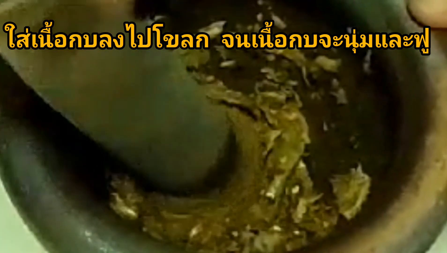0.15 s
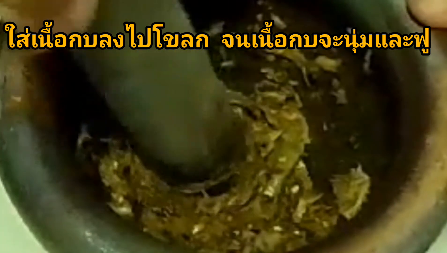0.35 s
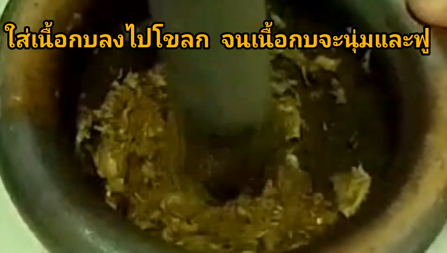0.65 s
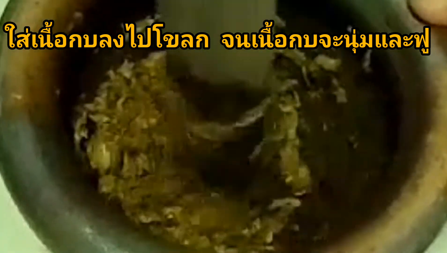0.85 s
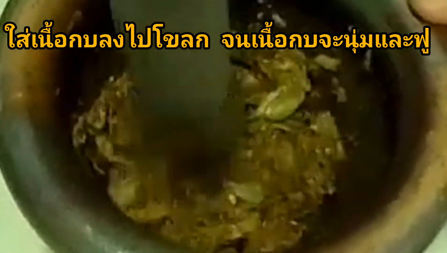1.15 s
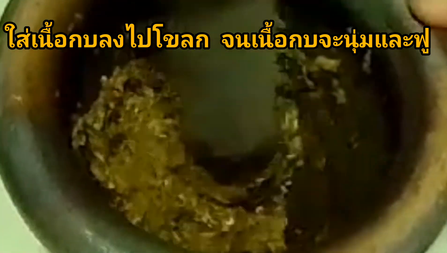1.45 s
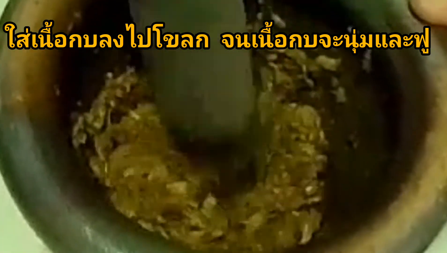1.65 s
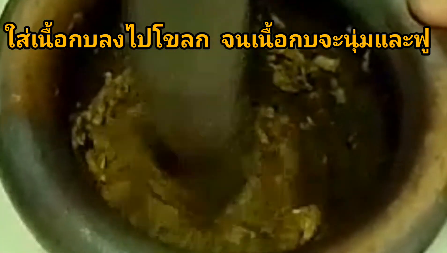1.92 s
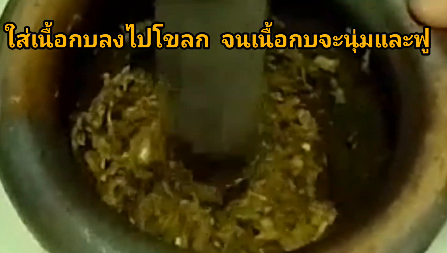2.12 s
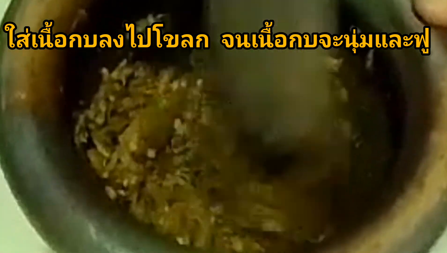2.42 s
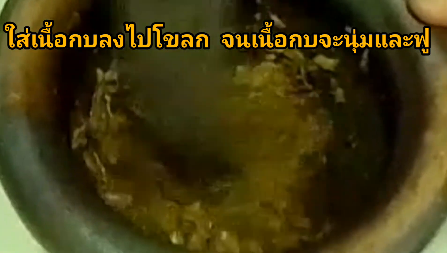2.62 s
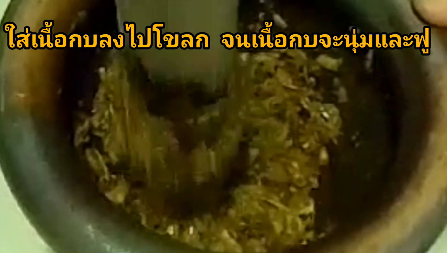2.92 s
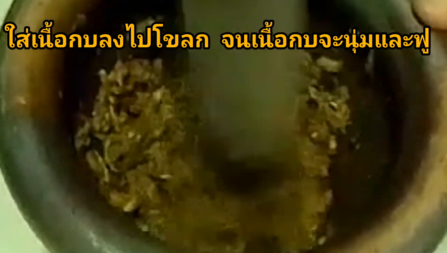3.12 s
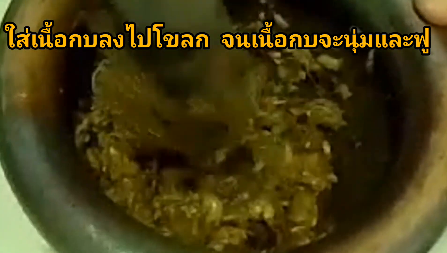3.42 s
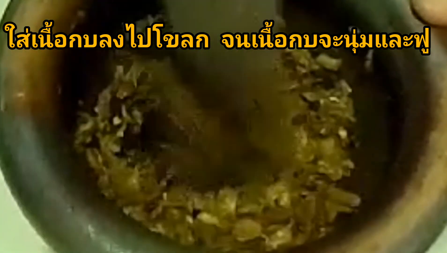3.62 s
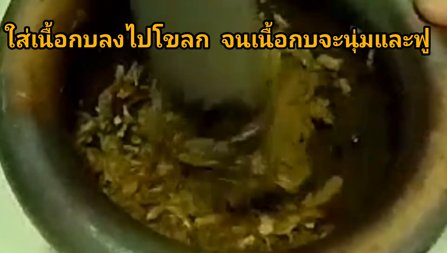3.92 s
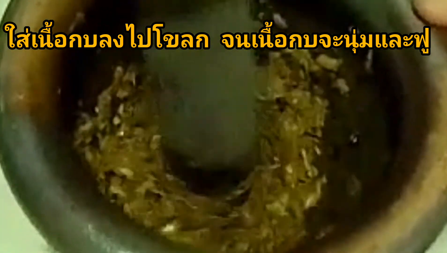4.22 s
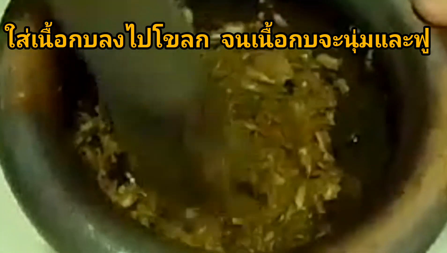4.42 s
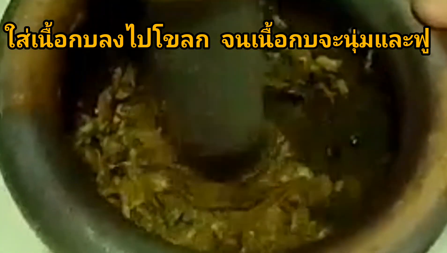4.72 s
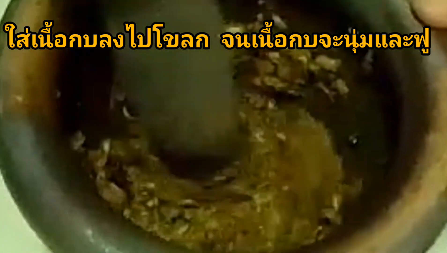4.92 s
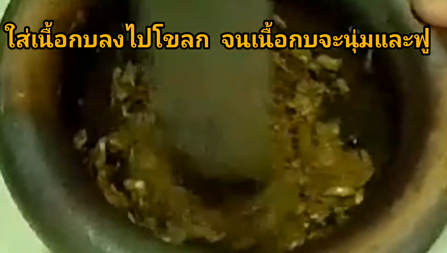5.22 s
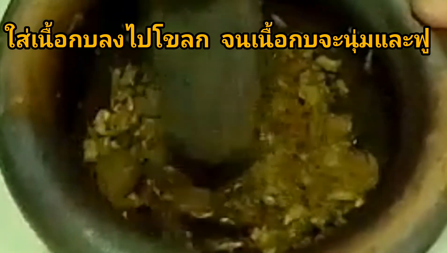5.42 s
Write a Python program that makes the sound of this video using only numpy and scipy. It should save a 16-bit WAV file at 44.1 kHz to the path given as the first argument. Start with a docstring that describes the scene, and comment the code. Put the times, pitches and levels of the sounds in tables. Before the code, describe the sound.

A stone pestle pounds moist, shredded food in a stone mortar, soft gritty squashes mixed with uneven hard clacks and short ringing knocks.

```python
"""On a kitchen counter, close to a small microphone, a stone pestle pounds moist food in a stone mortar.
Most strokes only squash the food, heard as swells of grainy noise with a wet body and a bright fizz.
Some reach the stone, clack and skid: force pulses excite decaying modes of bowl, pestle and counter.
The food sets the rim singing faintly, the room answers with a brief tail of sparse echoes, and
a steady room tone, a wavering low rumble and a drone, all shaped noise, lie behind."""
import sys
import numpy as np
from scipy import signal
from scipy.fft import rfft, irfft
from scipy.io import wavfile
from scipy.ndimage import uniform_filter1d

SR = 44100
rng = np.random.default_rng(int(sys.argv[2]) if len(sys.argv) > 2 else 0)


def volts_from_db(level):
    """Convert decibel levels to linear amplitude ratios."""
    exponent = np.asarray(level, float) / 20
    return 10 ** exponent


def bounce(signal):
    """Save signal as a 16-bit WAV file at the path given by the first command-line argument."""
    frames = np.transpose(np.atleast_2d(signal))
    limited = np.clip(frames, -1, 1)
    pcm = np.round(limited * 32767).astype(np.int16)
    wavfile.write(sys.argv[1], SR, pcm)


N = 245195  # samples


def evened(x):
    """Normalisation: scales a signal to unit rms."""
    return x / np.sqrt(np.mean(x ** 2) + 1e-20)


def read(points, hz):
    """Interpolation of a curve along a logarithmic frequency axis."""
    f, value = np.transpose(points)
    return np.interp(np.log(hz + 1), np.log(f + 1), value)


def add(mix, s, sound):
    """Superposition: adds a sound to the mix, in place, from s seconds on."""
    part = mix[round(s * SR):][:len(sound)]
    part += sound[:len(part)]


def coloured(x, spectrum):
    """Linear filtering: weights the spectrum of x by a curve in dB, then sets rms 1."""
    hz = np.fft.rfftfreq(len(x), 1 / SR)
    shaped = rfft(x) * volts_from_db(read(spectrum, hz))
    return evened(irfft(shaped, len(x)))


def grit(spread_db, shape):
    """Impulsive noise: a heavy-tailed law lets a few grains stand far above the rest."""
    boost = np.minimum(rng.exponential(1, shape), 6)
    return rng.standard_normal(shape) * volts_from_db(spread_db * boost)


# Clean knocks of stone on stone. Each row: start in seconds, then the levels in dB of
# clack, bowl ring, pestle ring and counter thud, all before the filters in stones().
STONE_KNOCKS = [(0.8225, -24.5, -61, -47, -84), (.8283, -46, -65, -53, -53), (2.0295, -34, -54, -82, -52.5),
                (2.1899, -35, -53, -67, -40.5), (2.194, -46, -32.5, -80, -76),
                (2.5184, -27.5, -52, -27.5, -80), (3.2125, -45, -66, -72.5, -68),
                (3.9056, -27.5, -79, -28, -67), (4.07, -41, -53, -65, -63), (4.082, -61, -34, -52, -69),
                (4.9534, -37, -41.5, -72, -73), (5.156, -39, -34, -85, -51), (5.493, -46, -28, -68, -39.5),
                (5.498, -23, -66, -45, -47.5)]
# Skids of the pestle over gritty stone. Each row: start in seconds, time to full load in seconds,
# then the levels in dB of clack, bowl ring and pestle ring, before the same filters.
GRITTY_SKIDS = [(.676, 0.0014, -78, -63.5, -88), (0.722, 0.012, -57, -90, -83),
                (.819, 0.0026, -29.5, -52, -16.5), (.834, 0.0019, -50, -56, -26.5),
                (0.849, 0.0085, -41, -54, -41), (.964, 0.011, -51, -48, -33), (1.076, 0.011, -63, -69, -75),
                (1.229, 0.0035, -59.5, -93, -103), (1.508, 0.0043, -55.5, -62, -90),
                (1.832, 0.002, -61.5, -55.5, -86), (2.031, 0.0018, -59, -43, -82),
                (2.049, 0.013, -50.5, -52.5, -94), (2.216, 0.0046, -69, -47.5, -88),
                (2.524, 0.0024, -48, -77, -41.5), (2.529, .008, -32.5, -31.5, -74),
                (2.551, 0.0061, -49, -41.5, -64), (2.588, 0.0091, -55, -61, -72),
                (2.713, .0078, -45.5, -51.5, -81), (2.734, 0.007, -51.5, -55.5, -90),
                (2.768, .006, -53, -59, -82), (2.876, 0.0043, -64, -57.5, -81), (3.054, .01, -68, -50, -90),
                (3.215, 0.0056, -52, -47.5, -87.5), (3.727, 0.011, -53, -49.5, -80.5),
                (3.752, 0.0041, -55, -52.5, -88), (3.793, 0.0054, -73, -62, -90),
                (3.915, 0.011, -46, -52.5, -37.5), (3.967, 0.015, -55, -67, -95),
                (4.087, 0.0018, -34, -39, -66), (4.105, 0.0066, -41.5, -43.5, -60),
                (4.134, 0.016, -56, -58.5, -82), (4.423, 0.015, -86, -53, -102),
                (4.48, 0.019, -69, -65, -96), (4.958, 0.014, -36, -71, -73),
                (4.973, 0.0065, -51, -36.5, -66), (5.022, 0.021, -53.5, -59, -88),
                (5.186, 0.012, -54, -53, -87), (5.324, 0.0017, -44.5, -38, -75),
                (5.349, 0.007, -59, -51, -88), (5.465, 0.0035, -52, -58, -46.5)]


def contacts():
    """Contact loading: rows of start s, clack, bowl, pestle and thud dB, and time to full load s."""
    knock_s, squash_s = 0.00049, 0.0053  # times to full load
    skid_thud_db = -22  # against the louder of clack and bowl ring
    knocks = [(*row, knock_s) for row in STONE_KNOCKS]
    skids = [(s, clack, bowl, pestle, max(clack, bowl) + skid_thud_db, load_s)
             for s, load_s, clack, bowl, pestle in GRITTY_SKIDS]
    # a squash drives the counter here; its faint ringing is made in rim()
    squashes = [(s, -200, -200, -200, thud, squash_s) for s, _, _, thud, _ in FOOD_SQUASHES]
    return knocks + skids + squashes


def ring(force, modes, spot_db):
    """Modal response: a force excites decaying sines, shared out by the spot struck. Loudest 4 ms at rms 1."""
    t = np.arange(SR // 5) / SR
    tap = sum(volts_from_db(db + spot - 60 * t / t60) * np.sin(2 * np.pi * hz * t)
              for (hz, db, t60), spot in zip(modes, spot_db))
    tap *= volts_from_db(-20 * (t / .065) ** 3)  # paste and hand close on the stone and choke the ring
    sound = signal.fftconvolve(force, tap)
    return sound / np.sqrt(uniform_filter1d(sound ** 2, size=176).max())


# Modes of the bowl. Each row: frequency in Hz, relative level in dB before the random striking
# spot, t60 in seconds before the choke in ring(). The four mode tables below have the same columns.
BOWL_MODES = [(729, 0, .13), (705, -13, .07), (760, -6, .07), (610, -26, .05), (830, -15, .05)]
# Modes of the pestle.
PESTLE_MODES = [(1915, 0, .11), (1995, -7, .05), (4815, 2, .08), (4900, -4, .05), (3860, -2, .04),
                (5950, -16, .04), (8350, -20, .04)]
# Modes of the mortar wall, heard in the clack.
WALL_MODES = [(1000, -6, .025), (1090, -4, .03), (1200, -2, .04), (1290, -2, .03), (1400, -3, .025),
              (1510, 0, .04), (1600, 0, .035), (1705, 0, .04), (1810, -3, .025), (2075, -3, .04),
              (2200, -8, .025), (2350, -12, .04)]
# Short modes that make the crack of the clack.
CRACK_MODES = [(1390, 18, 0.00703), (2970, 3, 0.015), (3280, -4.5, .012), (3976, 11.5, .012)]
# Modes of the counter.
COUNTER_MODES = [(68, -23.5, 0.017), (97, -8, 0.033), (170, 0.5, 0.06), (217, 4.5, 0.12),
                 (257.7, 13, 0.065), (364, -4.5, 0.33), (429, -18.5, 0.088)]


def stones():
    """Forced vibration: grit in each contact load drives the rings, its bulk the counter."""
    rings, thuds, t = np.zeros(N), np.zeros(N), np.arange(SR // 9) / SR
    rows = contacts()
    spots = rng.standard_normal((len(rows), 16))
    grains = grit(4.76, (len(rows), len(t)))
    for (s, clack_db, bowl_db, pestle_db, thud_db, load_s), spot, grain in zip(rows, spots, grains):
        u = t / np.clip(load_s, .0001, .03)
        load = u * np.exp(1 - u)
        force = load * (8 * np.exp(-load_s / .0005) + grain)  # a brief contact is one clean tap
        change = np.diff(force)  # the clack follows changes of force
        push = np.diff(load) + .02 * force[1:]
        add(rings, s, volts_from_db(clack_db) * ring(change, WALL_MODES + CRACK_MODES, 3 * spot))
        add(rings, s, volts_from_db(bowl_db) * ring(force, BOWL_MODES, 3 * spot[::-1]))
        add(rings, s, volts_from_db(pestle_db) * ring(force, PESTLE_MODES, 3 * spot[4:]))
        add(thuds, s, volts_from_db(thud_db) * ring(push, COUNTER_MODES, 4 * spot[8:]))
    # a small bowl radiates no bass
    small = signal.butter(4, 600, "highpass", fs=SR, output="sos")
    # the mat under the mortar dulls the thud
    soft = signal.butter(2, 450, fs=SR, output="sos")
    # steep low-pass: little of the clack and rings is heard above 2.3 kHz
    steep = signal.butter(8, 2250, fs=SR, output="sos")
    rings = signal.sosfilt(steep, rings) + volts_from_db(-33) * rings
    return signal.sosfilt(small, rings) + signal.sosfilt(soft, thuds)


def pockets(x, depth_db):
    """Time-varying filtering: air pockets open and close, shifting the colour in narrow streaks."""
    z = signal.stft(x, nperseg=512)[2]
    patches = uniform_filter1d(rng.standard_normal(z.shape), size=2, axis=0)  # over frequency
    patches = uniform_filter1d(patches, size=8, axis=1)  # over time
    streaked = z * volts_from_db(depth_db * evened(patches))
    return evened(signal.istft(streaked, nperseg=512)[1][:N])


# The pestle comes down into the food. Each row: touch in seconds, fizz level in dB, wet body level
# in dB, counter thud level in dB before the mat, fall time in seconds before its limit in food().
FOOD_SQUASHES = [(0.673, -74, -66.5, -76, 0.014), (0.839, -71.5, -52, -84, 0.037),
                 (.997, -72.5, -53, -73, .024), (1.165, -74, -66.5, -82, 0.04), (1.33, -75, -68, -92, 0.02),
                 (1.503, -74, -66, -78, 0.015), (1.668, -69, -65, -89, 0.017),
                 (1.835, -69.5, -54, -57.5, 0.0062), (2.02, -76, -61.5, -81, 0.0087),
                 (2.183, -76, -57.5, -79, 0.0042), (2.355, -75, -61.5, -68, 0.0045),
                 (2.53, -66.5, -49.5, -60, 0.0037), (2.692, -77, -66.5, -76, .017),
                 (2.865, -79, -67, -56.5, 0.017), (3.046, -72, -57.5, -81, 0.0038),
                 (3.202, -74.5, -71, -60, 0.04), (3.379, -70, -64.5, -80.5, 0.018),
                 (3.553, -73, -71.5, -88, 0.024), (3.728, -76.5, -66, -58.5, 0.014),
                 (3.902, -75.5, -50.5, -57.5, 0.0096), (4.067, -71.5, -65.5, -51.5, 0.023),
                 (4.247, -79.5, -69, -70, 0.012), (4.421, -79.5, -69.5, -79, 0.024),
                 (4.596, -75, -69.5, -72.5, 0.017), (4.778, -77, -73, -80.5, 0.026),
                 (4.948, -75.5, -67, -54, 0.11), (5.144, -68, -62.5, -79, 0.023),
                 (5.313, -66, -61, -53, 0.021), (5.46, -71, -87, -52, 0.017), (5.49, -54.5, -52, -58, .006)]
# The food peels off as the pestle lifts. Each row: start in seconds, fizz level in dB,
# wet body level in dB.
FOOD_PEELS = [(.72, -74, -63.5), (1.067, -71, -57), (1.233, -77.5, -64.5), (1.393, -85, -76),
              (1.566, -83, -66), (1.726, -81, -66), (1.894, -81, -69.5), (2.253, -82, -58.5),
              (2.43, -93, -70.5), (2.583, -85, -58), (2.764, -78, -78), (2.927, -94, -76.5),
              (3.099, -89, -75), (3.269, -74.5, -68), (3.441, -88, -74), (3.623, -84, -75),
              (3.79, -89, -67), (3.971, -78.5, -69), (4.138, -83, -73.5), (4.318, -75, -69),
              (4.487, -92, -69), (4.671, -95, -76.5), (5.031, -82, -70), (5.212, -71.5, -70),
              (5.255, -90, -75), (5.383, -68, -63.5), (5.53, -77, -78)]
# The wet mash keeps rustling between strokes. Each row: time in seconds, fizz level in dB,
# wet body level in dB.
MASH_RUSTLE = [(.6, -115, -100), (.7, -105, -80.5), (1.4, -105, -87.5), (3.6, -108, -87),
               (4.5, -105, -82.5), (4.94, -108, -79), (4.971, -85, -67), (5.13, -96, -71), (5.17, -86, -72),
               (5.3, -92, -77), (5.34, -94, -79.5), (5.56, -88, -60)]
# Spectrum of the wet body. Each row: frequency in Hz, relative density in dB per Hz.
WET_SPECTRUM = [(250, -52.5), (500, -18), (800, -4.5), (1500, -3.5), (2400, -8), (3300, -11), (4200, -20),
                (6000, -26), (9000, -72)]
# Spectrum of the fizz. Each row: frequency in Hz, relative density in dB per Hz.
FIZZ_SPECTRUM = [(1500, -63), (2800, -24.5), (4000, -3), (5500, -8), (7000, -0.5), (8600, 4), (9600, -8.5),
                 (11500, -13.5), (15000, -12.5), (16000, -33.5)]


def food():
    """Amplitude modulation: quick swells on crackling grains give a wet body and a brighter fizz."""
    squash_rise_s, peel_rise_s, peel_fall_s = 0.0064, 0.006, 0.011
    peak_after_s = 0.0084  # the crackle peaks this long after the touch
    lead_s = .04  # room for the rise ahead of the peak
    t = np.arange(SR // 5) / SR - lead_s
    s, fizz_db, wet_db = np.transpose(MASH_RUSTLE)
    clock = np.arange(N) / SR
    fizz = volts_from_db(np.interp(clock, s, fizz_db))
    wet = volts_from_db(np.interp(clock, s, wet_db))
    squashes = [(s, fizz_db, wet_db, squash_rise_s, fall) for s, fizz_db, wet_db, _, fall in FOOD_SQUASHES]
    peels = [(*row, peel_rise_s, peel_fall_s) for row in FOOD_PEELS]
    for s, fizz_db, wet_db, rise, fall in squashes + peels:
        rise, fall = np.clip([rise, fall], .001, .05)
        scale = np.where(t < 0, rise, fall)
        swell = np.exp(-(np.abs(t) / scale) ** np.where(t < 0, 1.5, 1.2))
        add(wet, s + peak_after_s - lead_s, volts_from_db(wet_db) * swell)
        add(fizz, s + peak_after_s - lead_s, volts_from_db(fizz_db) * swell)
    grains = pockets(grit(3.2, N), depth_db=5)
    return wet * coloured(grains, WET_SPECTRUM) + fizz * coloured(grains, FIZZ_SPECTRUM)


# Faint, free modes of the rim. Each row: frequency in Hz, relative level in dB, t60 in seconds.
RIM_MODES = [(1720, 3, 0.25), (2150, 5, .15), (2440, 5, 0.2), (2820, 0, .12), (3440, -6, .2),
             (3860, 0, 0.3), (4950, -2, 0.15), (5250, -4, .25), (5950, 0, 0.15)]


def rim(x):
    """Resonance: a sound in the mortar, convolved with decaying sines, leaves the free rim singing."""
    t = np.arange(SR // 3) / SR
    tap = sum(volts_from_db(db - 60 * t / t60) * np.sin(2 * np.pi * hz * t) for hz, db, t60 in RIM_MODES)
    return signal.oaconvolve(x, tap)[:N] * volts_from_db(-59)


# Reverberation of the kitchen. Each row: frequency in Hz, t60 in seconds.
KITCHEN_DECAY = [(200, .2), (800, .16), (1400, .16), (2000, .13), (3500, .22), (6000, .16), (12000, .1)]


def kitchen(x):
    """Reverberation: sparse echoes of random sign, each band dying at its own speed."""
    taps = np.zeros(SR // 2)
    at = np.arange(260, len(taps) - 20, 20)
    taps[at + rng.integers(0, 20, len(at))] = rng.choice([-1., 1.], len(at))
    hz, t, z = signal.stft(taps, SR, nperseg=256)
    decay = volts_from_db(-60 * t / read(KITCHEN_DECAY, hz)[:, None])
    tail = signal.istft(z * decay, SR, nperseg=256)[1]
    return signal.fftconvolve(x, tail / np.linalg.norm(tail))[:N]


# Spectrum of the room tone. Each row: frequency in Hz, relative density in dB per Hz.
TONE_SPECTRUM = [(20, -14), (45, 7), (80, -3.5), (160, -22.5), (300, -18), (400, -12), (650, -23),
                 (1000, -22.5), (1280, -14), (1600, -30), (2500, -32), (4000, -42.5), (8000, -44),
                 (16000, -55)]
# Spectrum of the rumble. Each row: frequency in Hz, relative density in dB per Hz.
RUMBLE_SPECTRUM = [(12, -39), (25, -16.5), (48, 4), (70, -3.5), (110, -6.5), (140, -30.5), (300, -100)]
# Spectrum of the drone. Each row: frequency in Hz, relative density in dB per Hz.
DRONE_SPECTRUM = [(50, -81), (110, -23.5), (150, -4.5), (182, -2), (230, -10.5), (265, -18), (320, -29.5),
                  (500, -100)]
# Wavering of the background. Each row: time in seconds, rumble level in dB, drone level in dB.
BACKGROUND_LEVELS = [(0.0, -84, -92), (0.48, -78.5, -101), (0.73, -76.5, -77), (0.9, -64.5, -72),
                     (0.99, -66, -72.5), (1.25, -72, -80.5), (1.47, -71.5, -88), (2.18, -65.5, -68),
                     (2.49, -69.5, -74.5), (2.79, -65, -67.5), (3.76, -67, -73.5), (4.06, -67.5, -60),
                     (4.24, -69, -74), (4.51, -65, -77), (4.99, -68, -72.5), (5.14, -66.5, -59),
                     (5.56, -66, -61)]


def background():
    """Shaped noise: a steady room tone, with a lumpy rumble and a fuzzy drone that come and go."""
    s, rumble_db, drone_db = np.transpose(BACKGROUND_LEVELS)
    t = np.arange(N) / SR
    tone, rumble, drone = rng.standard_normal((3, N))
    return (volts_from_db(-73) * coloured(tone, TONE_SPECTRUM)
            + volts_from_db(np.interp(t, s, rumble_db)) * coloured(rumble, RUMBLE_SPECTRUM)
            + volts_from_db(np.interp(t, s, drone_db)) * coloured(drone, DRONE_SPECTRUM))


def scene():
    """Superposition of mortar and food, their echo 12 dB down, and the background."""
    paste = food()
    near = stones() + paste + rim(paste)
    return (near + volts_from_db(-12) * kitchen(near) + background())[None]


def band_limit(x):
    """A steep low-pass at the top of the band."""
    return signal.sosfilt(signal.butter(12, 15480, fs=SR, output="sos"), x)


# Slowly drifting bias of the converter. Each row: time in seconds, level as a share of full scale.
CONVERTER_BIAS = [(0, 0.0033), (.64, 0.0033), (0.738, 0.004), (5.56, 0.0061)]


def record(dry):
    """Direct-current offset: the converter adds its bias to the sound."""
    s, bias = np.transpose(CONVERTER_BIAS)
    mix = dry + np.interp(np.arange(N) / SR, s, bias)
    return band_limit(mix)


dry = scene()
out = record(dry)
bounce(out)
```